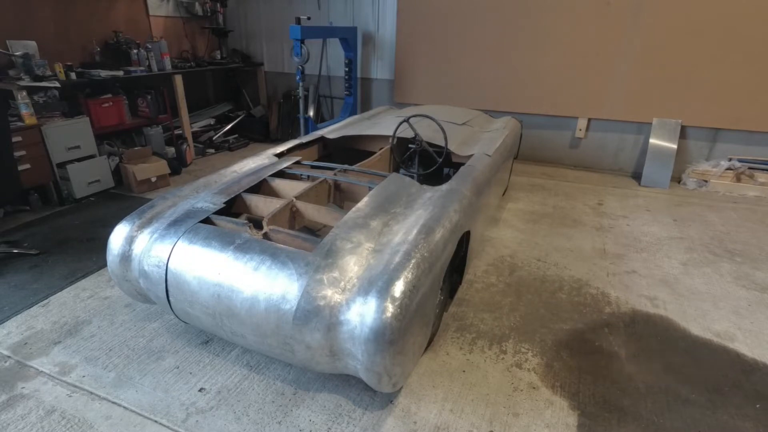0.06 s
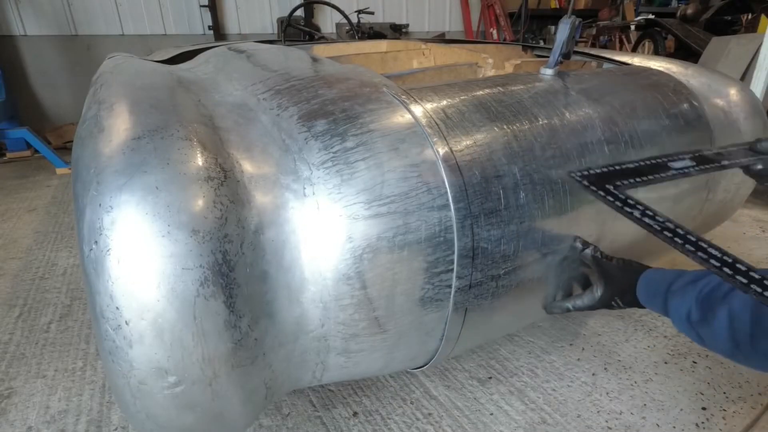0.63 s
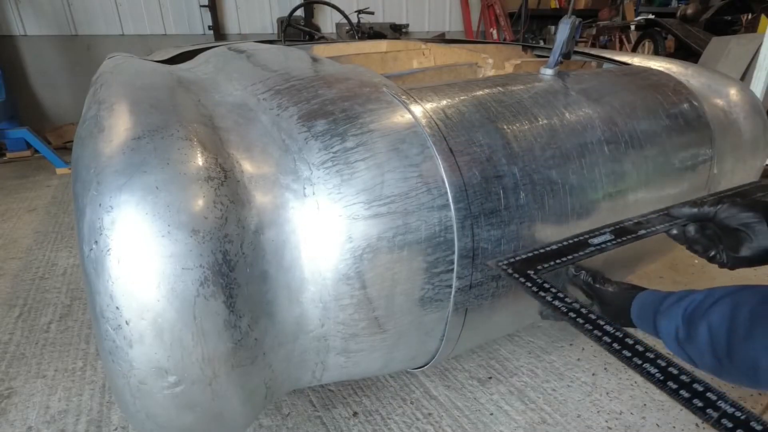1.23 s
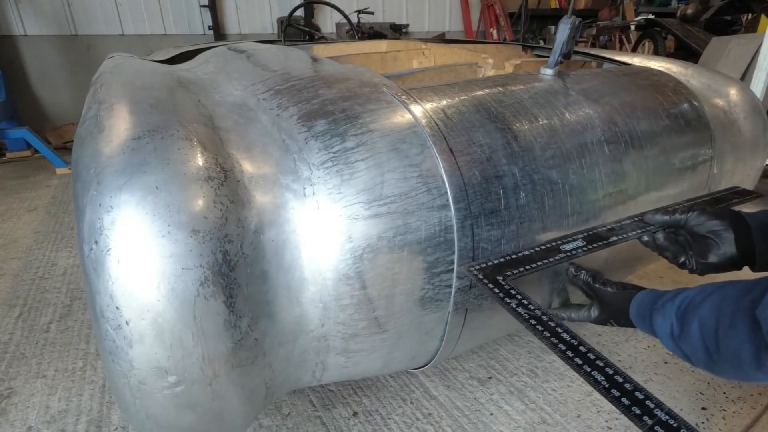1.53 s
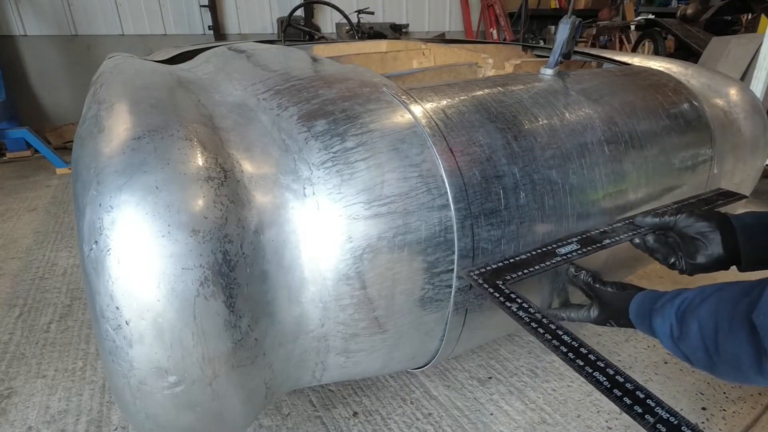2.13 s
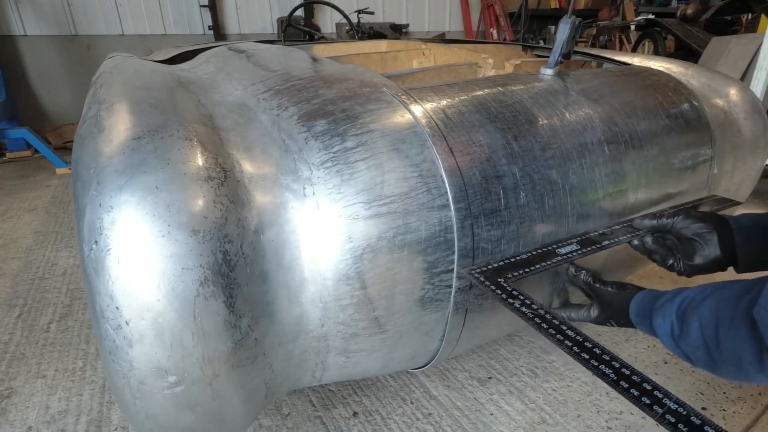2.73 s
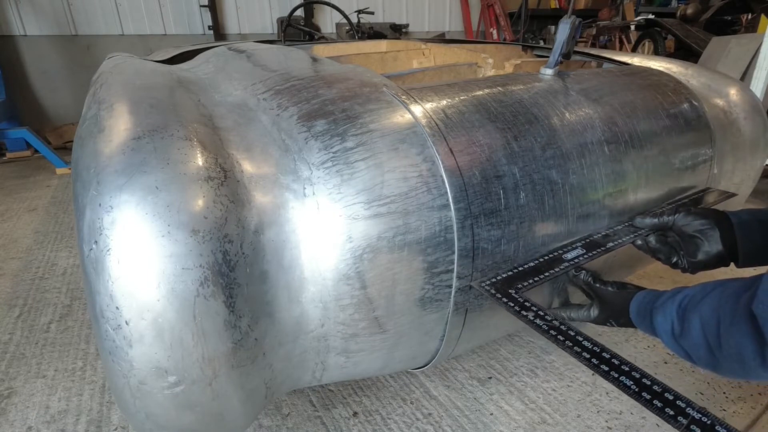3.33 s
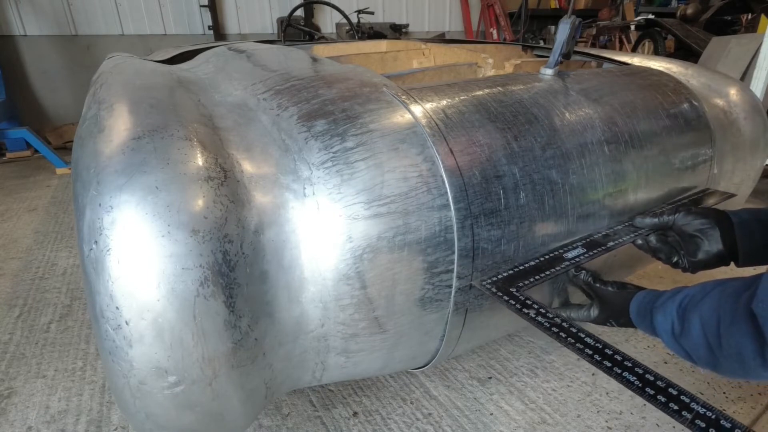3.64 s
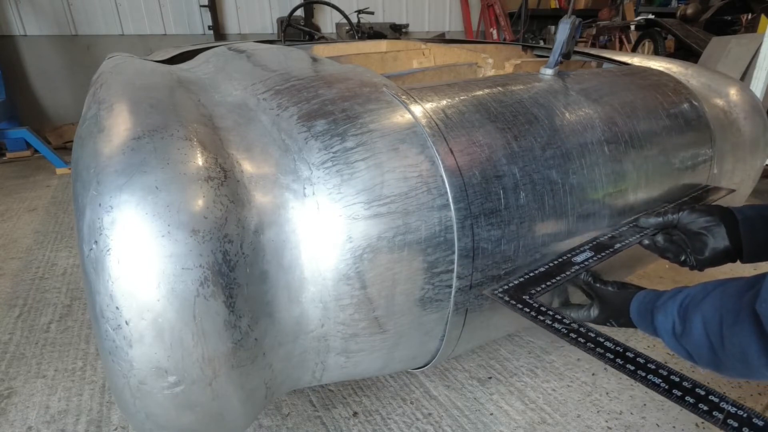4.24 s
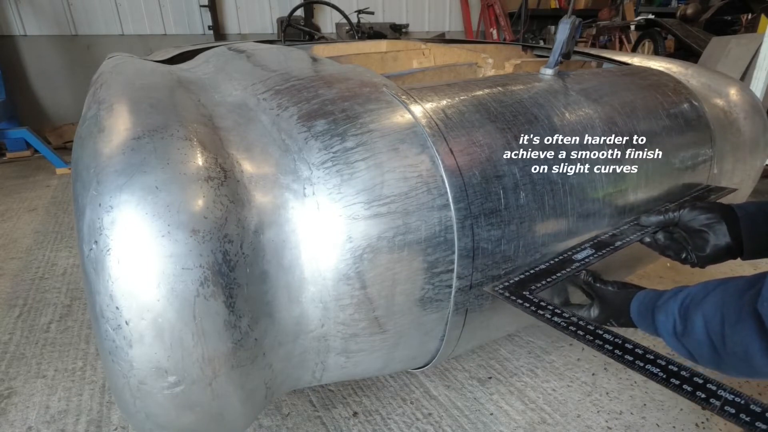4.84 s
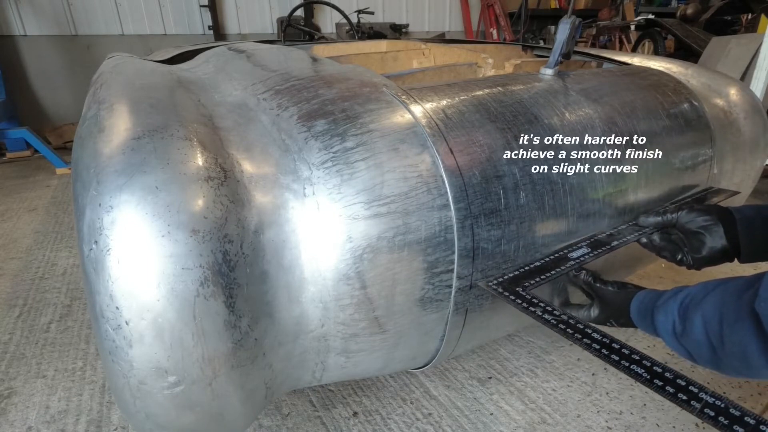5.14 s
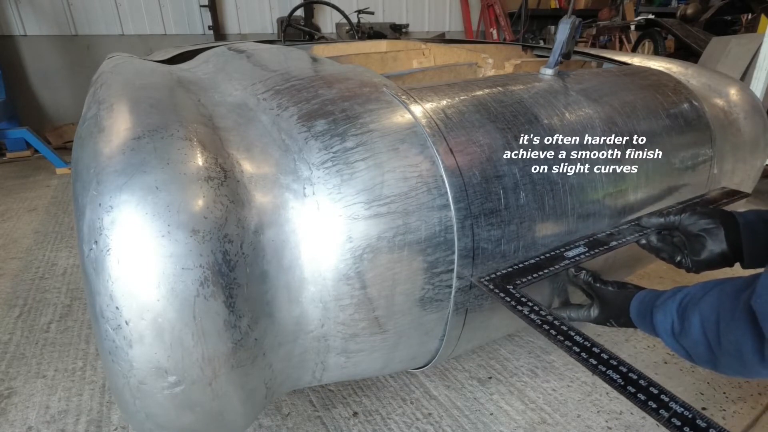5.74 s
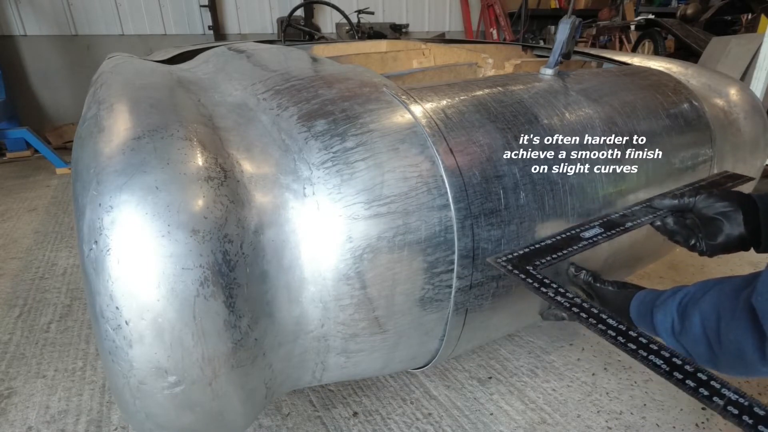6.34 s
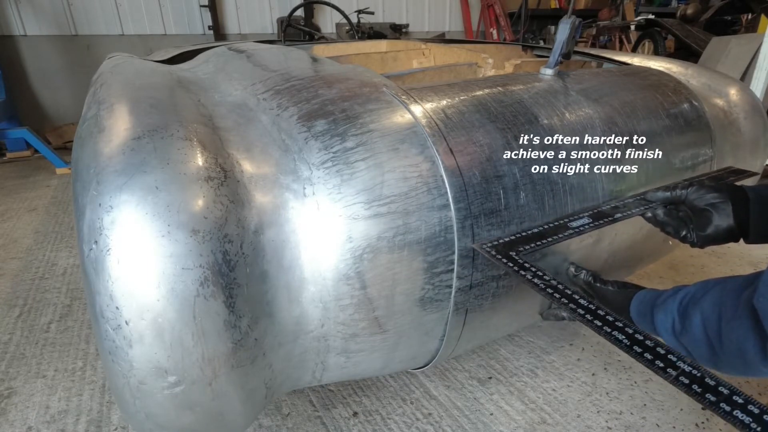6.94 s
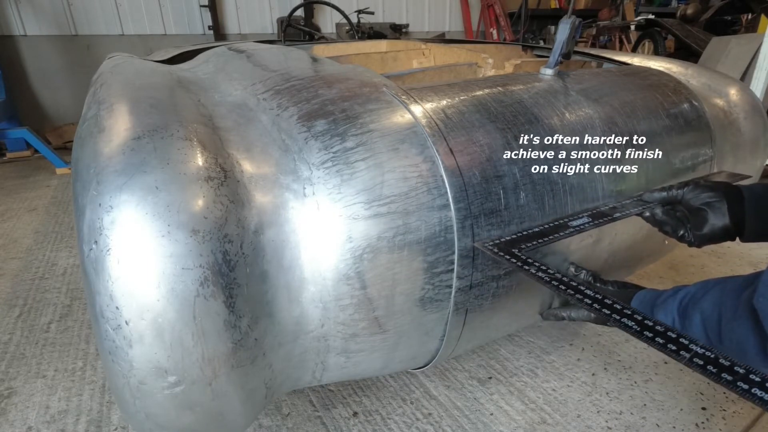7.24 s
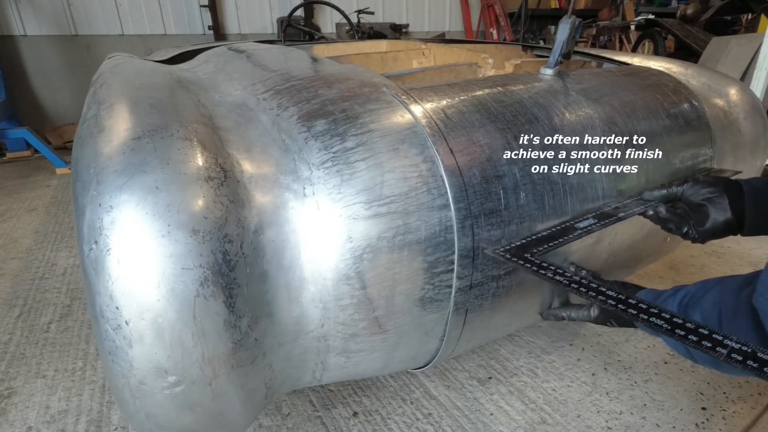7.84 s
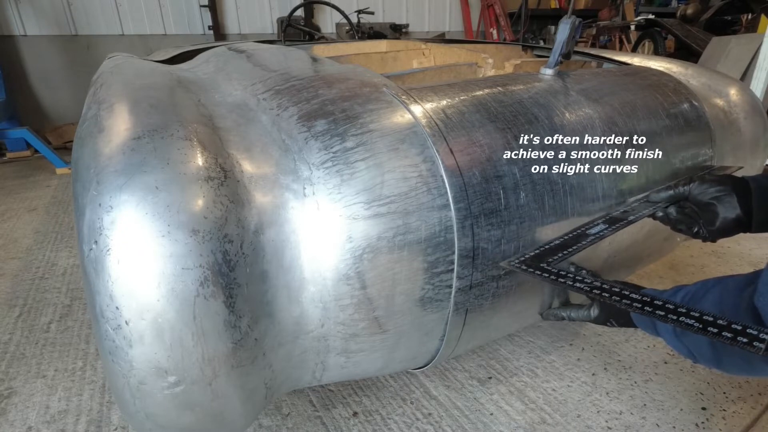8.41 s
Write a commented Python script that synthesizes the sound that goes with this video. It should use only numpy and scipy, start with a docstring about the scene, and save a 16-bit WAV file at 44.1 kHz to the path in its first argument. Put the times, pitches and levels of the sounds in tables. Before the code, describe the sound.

A steel square hits a thin aluminium car body with a sharp, rattling clash, then skids over it in short, drumming scrapes. A knock follows, then a run of faint taps as the tool rocks. Another bright clang and a few softer knocks come near the end. The hollow shell rings briefly after each contact, heard in stereo in a quiet garage with faint hiss.

```python
"""A thin aluminium car body sounds as a steel square clashes on it, skids, then rocks and taps.
Each impact launches bending waves, heard as a click, a tinny clang and a hollow knock, and leaves the
shell's modes ringing; an edge strike rings the square too. Stick-slip friction makes the skidding rubs
drum, scrape and rasp. All of it lingers in the shell and in a quiet garage with faint hiss and whines."""
import sys
import numpy as np
from scipy import signal
from scipy.fft import rfft, irfft, next_fast_len
from scipy.io import wavfile
from scipy.ndimage import uniform_filter1d, map_coordinates

SR = 44100
rng = np.random.default_rng(int(sys.argv[2]) if len(sys.argv) > 2 else 0)


def to_wav(sig):
    """Store sig (one row per channel, or 1-D mono) as 16-bit WAV at the path in sys.argv[1].

    Samples outside -1..1 are clipped; the rate is SR.
    """
    pcm = np.clip(np.atleast_2d(sig), -1, 1) * 32767
    pcm = np.round(pcm).astype(np.int16)
    wavfile.write(sys.argv[1], SR, pcm.T)  # frames by channels


N = 382347
RING_SAMPLES = 2 ** 15

# clearest normal modes of the body shell: (frequency [Hz], relative level [dB], t60 [s])
SHELL_MODES = [(86, -20, 1.3), (126.5, -16, .8), (188, -2, 0.48), (214, -19, 0.71), (260, -18, .8),
               (306, -6.5, 0.36), (332.5, -12.5, 0.68), (450, -12.5, 1.3), (540, -37, 0.57),
               (623, -12.5, 0.66), (747, -5.5, 0.79), (866, -9.5, 0.72), (1107, -9.5, 0.97),
               (1360, -13.5, 0.38), (1514, -13, 0.57), (1643, -9.5, 0.22)]
# dense high sheet modes behind click and rasp: (frequency [Hz], relative level [dB])
CLICK_SPECTRUM = [(900, -33), (1700, 4.5), (2400, -4.5), (3500, -3.5), (5000, -4.5), (8000, -5),
                  (12000, -11), (16000, -16)]
# left-right likeness of the direct sound: (frequency [Hz], coherence [0-1])
DIRECT_COHERENCE = [(60, .97), (150, .997), (400, .993), (800, .96), (1500, .85), (3000, .5), (12000, .4)]


def amp(db):
    """Decibels to amplitude ratio."""
    return 10 ** (np.asarray(db) / 20)


def along(points, hz):
    """Interpolate (frequency, value) points on a logarithmic frequency axis."""
    freqs, values = np.transpose(points)
    return np.interp(np.log(hz + 1), np.log(freqs + 1), values)


def wobble(rate):
    """Smooth random modulation: a spline through rate knots a second."""
    knots = rng.standard_normal(int(N * rate / SR) + 4)
    return map_coordinates(knots, [np.arange(N) * rate / SR])


def filtered(x, response):
    """Linear filtering: multiply the spectrum by response(hz)."""
    size = next_fast_len(N + SR // 2)
    hz = np.fft.rfftfreq(size, 1 / SR)
    return irfft(rfft(x, size) * response(hz), size)[..., :N]


def noise(colour_db, coherence, size):
    """Partially coherent stereo noise of rms 1: the mid-side balance sets the coherence."""
    hz = np.fft.rfftfreq(size, 1 / SR)
    angle = np.arccos(np.clip(along(coherence, hz), -1, 1)) / 2
    spectrum = rfft(rng.standard_normal((2, size))) * amp(colour_db(hz))
    mid, side = irfft(spectrum * [np.cos(angle), np.sin(angle)], size)
    stereo = np.array([mid + side, mid - side])
    return stereo / np.sqrt(np.mean(stereo ** 2) + 1e-20)


def fade(t, rise, t60):
    """Damping: a soft onset, then exponential decay by 60 dB in t60 seconds."""
    return (1 - np.exp(-(t / rise) ** 2)) * np.exp(-np.log(1000) * t / t60)


def add(track, time, sound):
    """Superpose a sound on the track at a time in seconds."""
    start = max(0, round(time * SR))
    part = track[:, start:start + sound.shape[-1]]
    part += sound[..., :part.shape[-1]]


def garage():
    """Ambient noise floor: room tone wavering below 900 Hz, hiss and steady electrical whines."""
    # room tone and microphone hiss: (frequency [Hz], relative level [dB])
    air_spectrum = [(25, -23), (50, -17), (75, -8.5), (130, -4), (300, -3), (800, -16), (1300, -19.5),
                    (2000, -25), (3000, -25.5), (8000, -25), (13000, -27.5), (15000, -26)]
    # their left-right likeness: (frequency [Hz], coherence [0-1])
    air_coherence = [(60, 1), (300, .86), (650, 0.85), (1400, 0.74), (3000, 0)]
    # electrical tones: (frequency [Hz], level [dB])
    whines = [(15703.7, -79.5), (9631, -93.5)]
    t = np.arange(N) / SR
    air = noise(lambda hz: along(air_spectrum, hz), air_coherence, N)
    low = filtered(air, lambda hz: hz < 900)
    air += low * (amp(0.58 * wobble(8.2)) - 1)
    whine = sum(amp(db) * np.sqrt(2) * np.sin(2 * np.pi * hz * t) for hz, db in whines)
    return amp(-69) * air + whine


def antinode_db(hz, centre_hz, boost_db=6, log_width=.15):
    """Modal coupling: modes with an antinode under the contact are driven harder."""
    return boost_db * np.exp(-(np.log((hz + 1) / centre_hz) / log_width) ** 2)


def dense_modes(colour_db, rise, t60, spread_db, spread_t60, tail_db, tail_t60):
    """Modal overlap gives noise: a local burst, waves spreading in the shell, a duller room tail."""
    # left-right likeness of the reverberant field: (frequency [Hz], coherence [0-1])
    diffuse_coherence = [(60, .95), (150, .993), (300, .99), (650, .972), (1400, .77), (3000, 0),
                         (12000, 0)]
    t = np.arange(RING_SAMPLES) / SR
    early = t[:RING_SAMPLES // 4]
    envelope = fade(early, rise, t60) + amp(spread_db) * fade(early, rise, spread_t60)
    burst = noise(colour_db, DIRECT_COHERENCE, len(early)) * envelope
    onset_rms = np.sqrt(np.mean(burst[:, early < .03] ** 2))
    absorbed_db = lambda hz: colour_db(hz) - 8 * (hz / 10000) ** 2
    sound = amp(tail_db) * noise(absorbed_db, diffuse_coherence, RING_SAMPLES) * fade(t, .018, tail_t60)
    add(sound, 0, burst / onset_rms)
    return sound


def ring(modes, drive_db):
    """Free vibration: damped sinusoids driven by drive_db(hz), in new proportions at each blow."""
    t = np.arange(RING_SAMPLES) / SR
    hz, db, t60 = np.transpose(modes)[:, :, None]
    level_db = db + drive_db(hz) + 2 * rng.standard_normal(hz.shape)
    phase = 2 * np.pi * rng.random(hz.shape)
    return np.sum(amp(level_db) * np.sin(2 * np.pi * hz * t + phase) * fade(t, .002, t60), axis=0)


def contact_click(strength_db, hardness, landing_s):
    """Contact time limits bandwidth: a harder or stronger blow is briefer and reaches higher."""
    crisp_db = -34  # this strength doubles the cutoff
    cutoff_hz = 2300 * 2 ** (2.8 * hardness ** 2) * (1 + amp(strength_db - crisp_db) ** 2)
    colour_db = lambda hz: along(CLICK_SPECTRUM, hz) - 10 * np.log10(1 + (hz / cutoff_hz) ** 6)
    return dense_modes(colour_db, rise=.66 * landing_s, t60=.035,
                       spread_db=-6, spread_t60=.17, tail_db=-12, tail_t60=1)


def impacts():
    """Bending-wave dispersion: knock and clang build up after the click; shell and square ring on."""
    # the square lands, from flat face (hardness 0) to sharp corner (1):
    # (time [s], strength [dB], hardness [0-1], pitch of the struck spot [Hz])
    contacts = [ (0.010, -63, 0.07, 259), (0.532, -31, 0.96, 530), (0.541, -34.5, 1, 613),
                (0.551, -30, 0.99, 200), (1.088, -48.5, 0, 625), (2.071, -39, 0.54, 310),
                (2.525, -56, 0.51, 520), (2.842, -47, 0.16, 151), (3.492, -60.5, 0, 187.4),
                (3.563, -66, 0, 180), (3.882, -54.5, 0.68, 240), (4.108, -63.5, 0, 240),
                (4.261, -58, .28, 325), (4.359, -65.5, 0, 370), (4.494, -60, 0.5, 592),
                (4.554, -63.5, 0, 257), (4.791, -59.5, 0, 178), (4.858, -55, .4, 177),
                (4.882, -56.5, 0.2, 174), (4.918, -55, 0.44, 206), (5.009, -56.5, 0.53, 202),
                (5.024, -53, .3, 188), (5.249, -44.5, 0.58, 1120), (5.319, -56, 0.52, 175),
                (6.684, -34.5, 0.66, 470), (7.254, -60.5, 0.3, 176.3), (7.352, -63.5, 0, 175),
                (7.616, -48, 0.16, 177), (7.648, -56, 0.03, 184), (7.724, -56, 0, 191),
                (7.955, -46.5, 0.25, 402)]
    # dense low sheet modes: (frequency [Hz], relative level [dB])
    knock_spectrum = [(30, -70.5), (70, -44), (110, -19.5), (155, -2.5), (200, 0), (300, -3), (400, -6.5),
                      (520, -6.5), (700, -12.5), (1100, -41), (2000, -91.5)]
    # dense middle sheet modes: (frequency [Hz], relative level [dB])
    clang_spectrum = [(250, -40), (480, -22), (630, -4), (900, -2), (1400, -3), (1700, -13.5),
                      (2100, -16.5), (2800, -24.5), (4500, -39), (9000, -74)]
    # the tinny note rises with hardness: (hardness [0-1], frequency [Hz])
    clang_pitch = [(0, 620), (.25, 820), (.5, 1380), (1, 1556)]
    knock_lag_s, clang_lag_s = .0014, .0025
    firm_db, edge_hardness = -48, .42
    track = np.zeros((2, N))
    for time, strength_db, hardness, spot_hz in contacts:
        clang_db = strength_db - 10 + 9.5 * hardness
        click_db = strength_db - 35.5 + 30 * hardness
        landing_s = .002 * 2 ** (max(firm_db - strength_db, 0) / 9)  # weak blows land more slowly
        clang_hz = np.interp(hardness, *np.transpose(clang_pitch))
        spot_db = lambda hz: antinode_db(hz, spot_hz) + antinode_db(hz, clang_hz, boost_db=2)
        knock = dense_modes(lambda hz: along(knock_spectrum, hz) + spot_db(hz), landing_s + knock_lag_s,
                            t60=.06, spread_db=-10, spread_t60=.25, tail_db=-4.5, tail_t60=.99)
        clang = dense_modes(lambda hz: along(clang_spectrum, hz) + spot_db(hz), landing_s + clang_lag_s,
                            t60=.05, spread_db=-10.5, spread_t60=.25, tail_db=-10, tail_t60=1)
        click = contact_click(strength_db, hardness, landing_s)
        shell = ring(SHELL_MODES, lambda hz: along([(450, strength_db), (700, clang_db)], hz) + spot_db(hz))
        add(track, time, amp(strength_db) * knock + amp(clang_db) * clang + amp(click_db) * click)
        add(track, time, amp(-7.5) * shell)
        if hardness > edge_hardness:
            add(track, time, square_ring(click_db))
    return track


def rub_envelope(offset_db, bite_db, tail_db, tail_t60):
    """Incoherent sounds add in power: one layer's gain over all strokes and their reverberant tails."""
    # the edge skids over the panel: (time [s], duration [s], pressure [dB], bite of the edge [0-1])
    strokes = [ (0.422, 0.05, -65.5, 1), (0.488, .05, -59.5, 1), (0.791, 0.059, -36.5, 0.62),
               (0.827, 0.039, -32.5, 0.4), (0.888, .035, -35.5, 0.3), (0.982, 0.09, -39, 0.4),
               (1.125, 0.057, -38, 0.34), (1.27, 0.049, -46, 0.44), (1.417, 0.02, -47.5, 0.5),
               (1.506, 0.047, -46.5, 0.44), (3.36, 0.017, -59, 0.99), (6.02, 0.027, -63.5, 0.83),
               (6.165, 0.022, -59.5, 0.91), (8.035, .06, -60, 0.7)]
    attack_s, release_s = .0088, .0067
    t = np.arange(RING_SAMPLES) / SR
    power = np.zeros((1, N))
    for time, duration, pressure_db, bite in strokes:
        attack = 1 - np.exp(-(t / attack_s) ** 2)
        release = np.exp(-np.maximum(t - duration, 0) / release_s)
        add(power, time, (amp(pressure_db + offset_db + bite_db * bite) * attack * release) ** 2)
    decay = fade(t, attack_s, tail_t60) ** 2
    tail_power = np.abs(signal.fftconvolve(power[0], decay / decay.sum())[:N])
    return np.sqrt(power[0] + amp(tail_db) ** 2 * tail_power)


def resonance_db(hz, lift_db=7, half_width_hz=11):
    """Resonance: friction noise is lifted near each mode of the shell."""
    return lift_db * sum(1 / (1 + ((hz - mode_hz) / half_width_hz) ** 2) for mode_hz, _, _ in SHELL_MODES)


def rubs():
    """Stick-slip friction: the sheet drums, and the more the edge bites, the more it scrapes and rasps."""
    # the sheet drumming under the sliding edge: (frequency [Hz], relative level [dB])
    drum_spectrum = [(60, -65.5), (120, -19), (160, -0.5), (190, -1), (235, -3.5), (275, -3), (315, -3),
                     (370, -7), (450, -7), (620, -18), (1100, -48.5)]
    # the biting edge's scrape: (frequency [Hz], relative level [dB])
    scrape_spectrum = [(40, -59), (100, -32), (170, -21), (300, -18), (450, -3.5), (650, -2.5), (950, -6.5),
                       (1500, -11.5), (2200, -25.5), (4000, -38), (9000, -54)]
    drum = noise(lambda hz: along(drum_spectrum, hz) + resonance_db(hz), DIRECT_COHERENCE, N)
    running_rms = np.sqrt(np.abs(uniform_filter1d(drum[0] ** 2, size=SR // 25)))
    drum /= running_rms  # pressure alone sets its strength
    drum *= rub_envelope(offset_db=0, bite_db=0, tail_db=-2, tail_t60=1)
    scrape = noise(lambda hz: along(scrape_spectrum, hz) + resonance_db(hz), DIRECT_COHERENCE, N)
    scrape *= rub_envelope(offset_db=-15.5, bite_db=15.5, tail_db=-2, tail_t60=.85)
    rasp = noise(lambda hz: along(CLICK_SPECTRUM, hz), DIRECT_COHERENCE, N)  # countless tiny clicks
    rasp *= rub_envelope(offset_db=-36.5, bite_db=28.5, tail_db=-8.5, tail_t60=.6)
    catch_and_slip = amp(1.17 * wobble(rate=80))
    return drum + catch_and_slip * (scrape + rasp)


def square_ring(click_db, grip_limit_db=-64.5):
    """Normal modes of the square, struck on its edge; the gloved grip limits their amplitude."""
    # modes of the steel: (frequency [Hz], relative level [dB], t60 [s])
    steel_modes = [(2180, -2.5, 0.76), (2740, -22.5, .7), (2880, -8, 0.96), (3170, -8.5, .7),
                   (3410, -7, 0.95), (3600, -15.5, 1), (4400, -18, 0.9), (4666, -22, 0.97)]
    return ring(steel_modes, lambda hz: min(click_db - 12, grip_limit_db))


def scene():
    """Radiation efficiency falls in the deep bass; the panel's sound reaches the right microphone first."""
    lead_s, corner_hz = 7.5e-5, 110
    radiation = lambda hz: (hz ** 2 / (corner_hz ** 2 - hz ** 2 + 1.25j * corner_hz * hz)) ** 2
    delay = lambda hz: np.exp(1j * np.pi * hz * lead_s * np.array([[-1], [1]]))
    panel = filtered(impacts() + rubs(), lambda hz: radiation(hz) * delay(hz))
    return panel + garage()


def record(dry):
    """Frequency response: two band-limited microphones that differ mainly in the treble."""
    # microphone imbalance: (frequency [Hz], left minus right [dB])
    imbalance = [(100, -.8), (400, -.4), (1300, .8), (2400, -3.5), (4400, -.5), (8000, -2.5), (11000, -6),
                 (15000, -10)]
    top_hz = 15820
    split = np.array([[.5], [-.5]])
    return filtered(dry, lambda hz: amp(along(imbalance, hz) * split) * (hz < top_hz))


dry = scene()
out = record(dry)
to_wav(out)
```